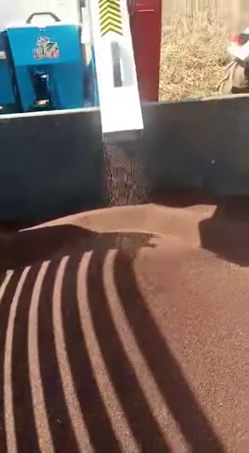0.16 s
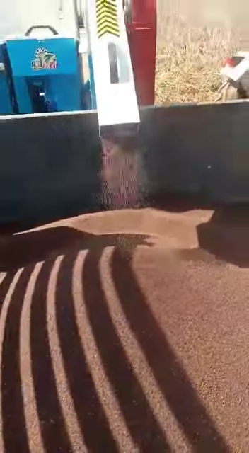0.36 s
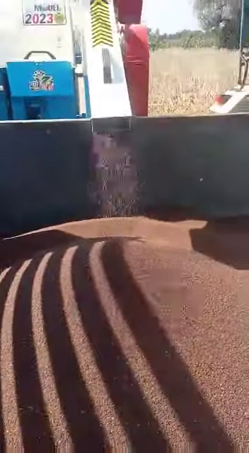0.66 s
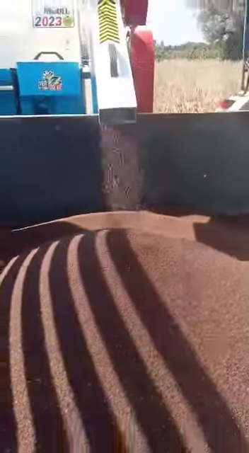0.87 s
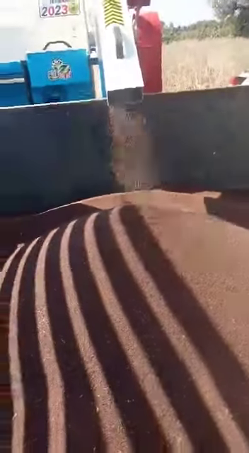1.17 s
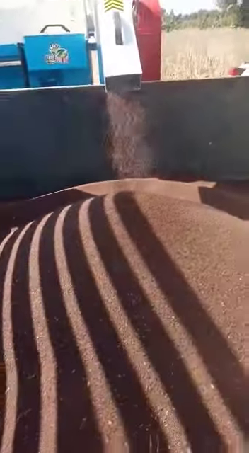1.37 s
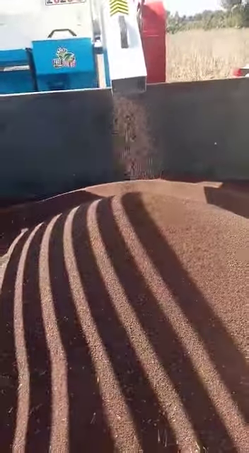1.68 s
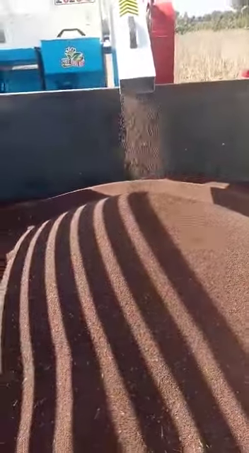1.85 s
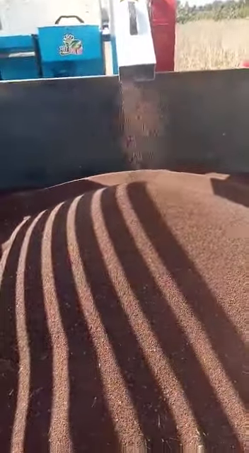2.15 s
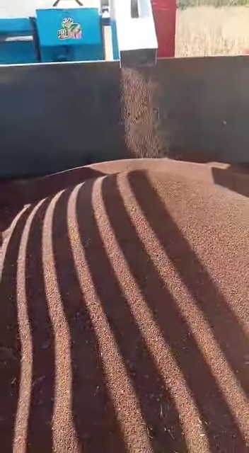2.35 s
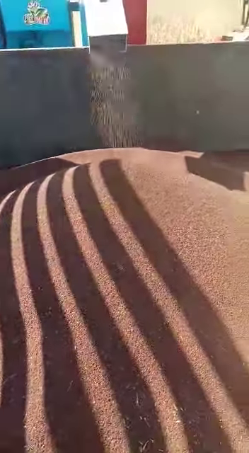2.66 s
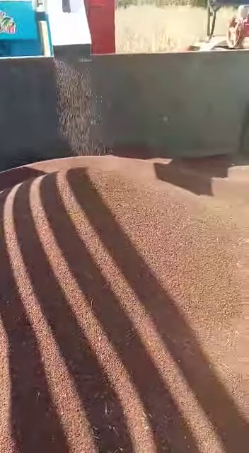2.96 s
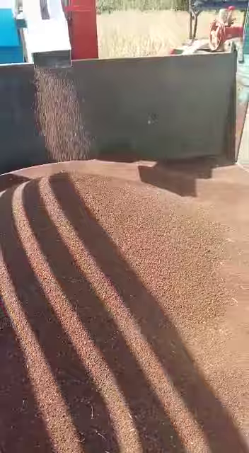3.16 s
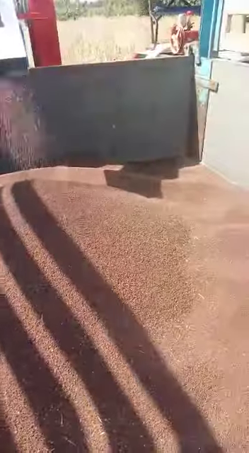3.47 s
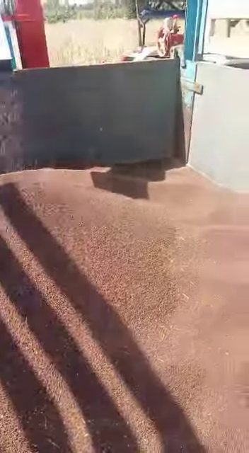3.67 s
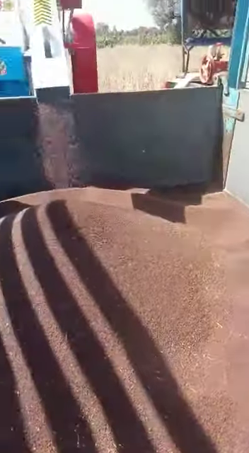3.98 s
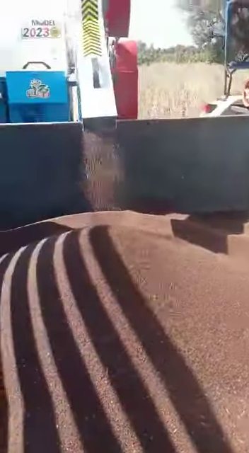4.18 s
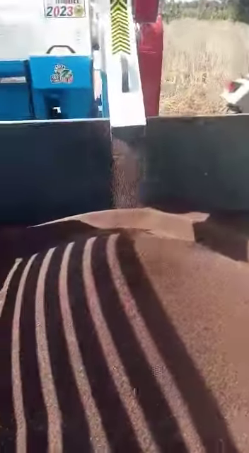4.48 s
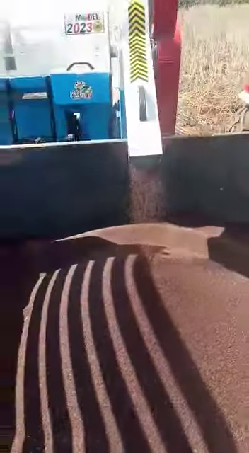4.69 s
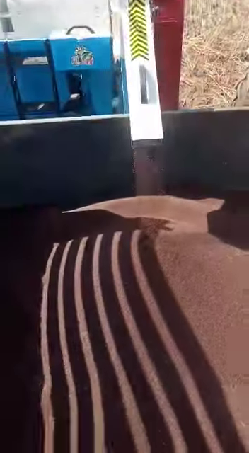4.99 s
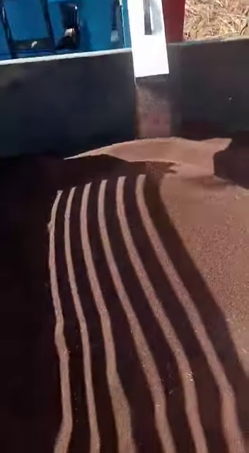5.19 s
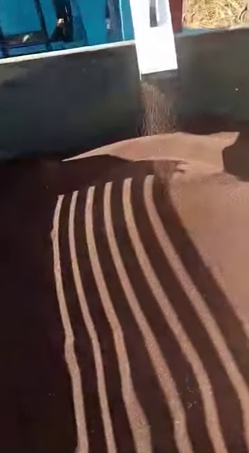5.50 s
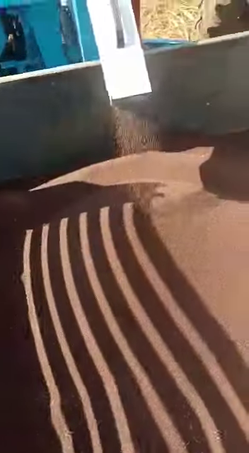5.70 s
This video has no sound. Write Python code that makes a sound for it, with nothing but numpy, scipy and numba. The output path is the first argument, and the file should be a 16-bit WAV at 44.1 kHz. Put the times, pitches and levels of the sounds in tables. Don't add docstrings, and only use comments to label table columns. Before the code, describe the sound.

A farm thresher drones and roars under load while grain hisses and rattles into a steel trailer, with constant metallic knocks and clinks close by.

```python
import sys
import numpy as np
from scipy import signal
from scipy.fft import rfft, irfft
from scipy.io import wavfile
from scipy.ndimage import uniform_filter1d
from numba import njit

SR = 44100
rng = np.random.default_rng(int(sys.argv[2]) if len(sys.argv) > 2 else 0)


def nominal_scale(level):
    x = np.asarray(level, float) / 20
    return 10 ** x


def materialize(psi):
    bounded = np.clip(np.atleast_2d(psi).T, -1, 1)
    quanta = np.round(bounded * 32767).astype(np.int16)
    wavfile.write(sys.argv[1], SR, quanta)


N = 257544


def level(x, db):
    return x * nominal_scale(db) / np.sqrt(np.mean(x ** 2))


def curves(table):
    s, *columns = np.transpose(table)
    return [np.interp(np.arange(N) / SR, s, c) for c in columns]


def swells(table):
    t = np.arange(0, N + 64, step=64) / SR
    s, db, length = np.transpose(table)[:, :, None]
    bells = db * np.exp(-0.5 * ((t - s) / length) ** 2)
    return np.interp(np.arange(N) / SR, t, bells.sum(axis=0))


def colour(x, spectrum):
    hz, db = np.transpose(spectrum)
    f = np.log(np.arange(N // 2 + 1) * SR / N + 1)
    gain = nominal_scale(np.interp(f, np.log(hz), db, left=-90, right=-90))
    return irfft(rfft(x) * gain, N)


def ring(x, hz, width):
    return signal.lfilter(*signal.iirpeak(hz, hz / width, fs=SR), x)


def shade(x, hz, db):
    upper = signal.sosfiltfilt(signal.butter(4, hz, "high", fs=SR, output="sos"), x)
    return x + (nominal_scale(db) - 1) * upper


def walk(rate):
    held = np.repeat(rng.standard_normal(int(N / SR * rate) + 2), repeats=8)
    slewed = uniform_filter1d(uniform_filter1d(held, size=8), size=8)
    return 1.3 * np.interp(np.arange(N) / SR * rate * 8, np.arange(len(held)), slewed)


def grains(rate, spread_db, tail_s):
    hit = (rng.random(N) < rate / SR) * nominal_scale(-spread_db * np.log(rng.random(N) + 0.04))
    puffs = signal.lfilter([1], [1, -np.exp(-1 / (tail_s * SR))], hit)
    return puffs * rng.standard_normal(N)


@njit
def chime(start, pole, size, ring_length, length):
    out = np.zeros(length + 4096)
    for k in range(len(start)):
        z, contact = size[k] + 0j, 1.
        for i in range(start[k], start[k] + ring_length[k]):
            z *= pole[k]
            contact *= .985
            out[i] += z.imag * (1 - contact)
    return out[:length]


def pings(modes_hz, scatter, ring_s, spread_db, count):
    when, part, detune, strength, decay = rng.random((count, 5)).T
    hz = modes_hz[(part * len(modes_hz)).astype(int)] * (1 + scatter * (2 * detune - 1))
    samples = ring_s * (.5 + decay) * SR
    pole = np.exp(2j * np.pi * hz / SR - 1 / samples)
    size = nominal_scale(-spread_db * np.log(strength + 0.029))
    start = (when * N).astype(np.int64)
    ring_length = np.minimum(4 * samples, 4096).astype(np.int64)
    return level(chime(start, pole, size, ring_length, N), 0)


def drum(depth_db, share=1, start_turns=-0.1):
    return nominal_scale(depth_db * np.cos(2 * np.pi * (share * 22.83 * np.arange(N) / SR + start_turns)))


# (time [s], seed stream level [dB], air through the drum level [dB])
LOAD_AT_PHONE = [(0, -21, -18), (.25, -25.5, -25.5), (.8, -26, -24), (1.2, -28.5, -25), (1.8, -26, -24.5),
                 (2.4, -28.5, -29), (3.0, -27.5, -24.5), (3.5, -27.5, -25), (4.2, -31, -28),
                 (4.7, -29, -25.5), (5.27, -27.5, -23), (5.38, -23.5, -22.5), (5.6, -23, -18),
                 (5.84, -19.5, -14)]
# (time [s], change [dB], length [s])
SIEVE_THROWS = [(0.058, 0.5, 0.015), (0.227, 5, 0.026), (0.404, 3, 0.037), (0.59, 2.5, 0.026),
                (0.659, 0, 0.024), (0.775, 2.5, 0.052), (1.93, 1, 0.023), (3.11, 2, 0.025),
                (3.29, 1.5, 0.032), (4.69, 2, 0.042), (5.05, 1, 0.017), (5.2, 1.5, 0.024),
                (5.48, 2.5, 0.033), (0.848, -2, 0.041), (0.947, 4.5, 0.014), (1.112, 3, 0.037),
                (1.292, 2.5, 0.037), (1.457, 3, 0.025), (1.652, 3.5, 0.012), (1.756, 3.5, 0.025),
                (2.069, 2.5, 0.011), (2.258, 3, 0.032), (2.418, 4, 0.013), (2.539, 1.5, 0.01),
                (2.765, 3, 0.019), (2.935, 3.5, 0.048), (3.473, 4, 0.022), (3.65, 3, 0.022),
                (3.816, 2, 0.013), (4.011, 3.5, 0.028), (4.176, 5.5, 0.034), (4.358, 3.5, 0.043),
                (4.527, 3, 0.015), (4.86, 4, 0.033), (4.974, -3, 0.012), (5.676, 4, 0.021),
                (5.823, 2, 0.023)]


def load():
    seed_db, air_db = curves(LOAD_AT_PHONE)
    return seed_db, air_db, swells(SIEVE_THROWS)


# (time [s], drum middle [dB], chute treble [dB], wind [dB])
PHONE_SHADE = [(0, -0.5, -1, -50), (.35, 4.5, -0.2, -46), (.9, 0, -1, -50), (1.3, -1.7, -1, -50),
               (1.8, 3, -0.9, -53), (2.5, 2, 0.8, -43), (3.0, 0.5, -0.2, -50), (3.6, -0.5, -1.5, -52),
               (3.95, 1.5, -1.2, -50), (4.45, -0.5, -1.5, -52), (5.0, 1, -0.5, -50), (5.3, 1, 1, -46),
               (5.36, -7, 2.5, -35), (5.45, -1.5, 2, -39), (5.65, -2.5, 3.5, -40), (5.84, -4, -4.5, -36)]
# (time [s], share [dB])
STEEL_SHARE = [
    (0, -9),
    (.7, -6),
    (2.0, -0.5),
    (3.1, -3),
    (4.0, -1.5),
    (5.2, -2),
    (5.45, -5.5),
    (5.84, -8),
]


def phone_turn():
    return curves(PHONE_SHADE) + curves(STEEL_SHARE)


# (time [s], change [dB], length [s])
WALL_BOOMS = [(.05, 11, 0.049), (.42, 15, 0.13), (.72, 4, .06), (1.45, 8, 0.099), (1.9, 7, .06),
              (2.39, 19, 0.029), (2.75, 11, 0.056), (3.12, 15, 0.036), (3.38, 15.5, 0.058), (3.6, 8, 0.12),
              (5.15, 9, 0.096), (5.42, 0, .02), (5.52, 6, 0.041), (5.65, 6, 0.037), (5.76, 1, 0.039)]


def wall_shake(air_db):
    return -38.5 + 1.87 * (air_db - air_db.mean()) + swells(WALL_BOOMS)


# (time [s], blade rate [Hz], level [dB])
BLADE_TONE = [(0.0, 133.6, -11), (0.5, 133.6, -12), (0.88, 134.4, -10), (1.25, 135.2, -11.5),
              (1.76, 135.1, -8.5), (2.05, 135.7, -10), (2.55, 136, -14), (2.75, 136.3, -9.5),
              (3.1, 134.6, -9), (3.5, 135.6, -5.5), (3.8, 135, -7.5), (4.05, 135.7, -9), (4.34, 136, -19),
              (4.8, 135.9, -20), (5.1, 134.9, -25.5), (5.3, 136.9, -25.5), (5.45, 133.6, -10),
              (5.84, 137.2, -25.5)]
# (time [s], change [dB], length [s])
CHAFF_CHOKES = [(0.142, -7.5, 0.033), (0.28, -2, 0.015), (0.356, -6, 0.027), (0.535, -2, 0.02),
                (0.76, -0.5, 0.015), (1.03, -1.5, 0.015), (1.935, -7, 0.0079), (2.045, -4.5, 0.013),
                (2.21, 0.5, 0.01), (2.49, -2.5, .025), (3.0, -1.5, 0.02), (3.17, -1.5, 0.026),
                (3.26, -1.5, 0.021), (0.707, -4.5, 0.027), (0.987, -9.5, 0.041), (1.16, -9, 0.032),
                (1.359, -6, 0.025), (1.45, -3.5, 0.021), (1.67, -4, 0.038), (1.832, -2.5, 0.031),
                (1.992, -8.5, 0.039), (2.173, -12, 0.047), (2.348, -6, 0.021), (2.415, -8.5, 0.048),
                (2.656, -9.5, 0.026), (3.352, -3.5, 0.018), (3.583, -2.5, 0.015), (3.706, -1.5, 0.018),
                (3.886, -4, 0.045), (4.115, -4, 0.033), (5.175, -21, 0.016), (5.239, -11, 0.015),
                (5.375, -10.5, 0.051), (5.55, -17, 0.088), (5.685, -3, 0.014)]
# (time [s], change [dB], length [s])
THIRD_SWELLS = [
    (0.01, 12, .12),
    (.4, 18, 0.13),
    (1.55, 14, 0.11),
    (2.1, 2, 0.26),
    (3.2, 15, 0.33),
    (3.65, 14, 0.072),
    (4.75, 20.5, 0.25),
    (5.5, 5, 0.084),
    (5.8, 16, 0.11),
]
# (time [s], change [dB], length [s])
FOURTH_SWELLS = [
    (0.01, 6.4, .1),
    (.28, 9.3, 0.26),
    (1.5, 11.6, 0.12),
    (2.8, 9.6, .1),
    (3.55, 16, 0.3),
    (4.7, 7.6, 0.18),
    (5.75, 4.7, 0.092),
]


def blower(wall_db):
    hz, open_db = curves(BLADE_TONE)
    choke_db = swells(CHAFF_CHOKES)
    hz = hz - 0.04 * choke_db
    first_db = open_db + choke_db
    second_db = 0.52 * first_db - 28.0
    third_db = -46.5 + swells(THIRD_SWELLS) - 4
    fourth_db = -38 + swells(FOURTH_SWELLS) - 7.0
    turns = 2 * np.pi * np.cumsum(hz * (1 + 0.0029 * walk(29.62))) / SR
    tone = nominal_scale(first_db + 0.76 * walk(45)) * np.sin(turns)
    for k, db in enumerate([second_db, third_db, fourth_db]):
        phase = (k + 2) * turns + 2.08 * k + 0.5 * walk(12)
        tone += nominal_scale(db + 2.0 * walk(12)) * np.sin(phase)
    engine_db = np.minimum(wall_db, -27) - 4.5
    tone += nominal_scale(engine_db + 2.0 * walk(12)) * np.sin(5 * turns / 2)
    return np.sqrt(2) * tone


# (frequency [Hz], level [dB])
SHAFT_LINES = [(34.5, -39), (47.1, -32.5), (55.3, -33), (67.6, -45), (83.1, -25), (94.4, -25.5),
               (119.1, -41), (157.6, -51), (166.7, -58), (187.2, -22), (207.8, -33), (215.8, -25.5),
               (228.8, -48), (237.2, -37)]


def shafts():
    drift = np.cumsum(1 + 0.00192 * walk(1.545)) / SR
    out = np.zeros(N)
    for hz, db in SHAFT_LINES:
        out += nominal_scale(db + 2.0 * walk(3.93)) * np.sin(2 * np.pi * (hz * drift + rng.random()))
    return out


# (frequency [Hz], level [dB per Hz])
RUMBLE_OUTLINE = [(15, -50), (25, -26), (81, -10.5), (103, -3.5), (129, 5), (156, -6), (182, -1),
                  (230, -4.5), (300, -61), (510, -120)]


def hum(air_db):
    blower_db = curves(BLADE_TONE)[1]
    gain = np.hypot(nominal_scale(-25.5 + 0.53 * blower_db), nominal_scale(-16 + air_db))
    rumble = level(colour(rng.standard_normal(N), RUMBLE_OUTLINE), 3.5)
    return (level(shafts(), 0.36) + rumble) * gain


# (frequency [Hz], level [dB per Hz])
ROAR_OUTLINE = [(140, -18), (230, -1), (389, -1), (454, -5.5), (542, -3), (632, -10.5), (696, -5.5),
                (776, -8), (900, -7.5), (1170, -19), (1980, -120)]
# (time [s], change [dB], length [s])
STRAW_WADS = [(.06, -4, 0.025), (.24, 3, 0.033), (1.09, 2.5, 0.018), (1.422, 0, 0.016), (1.532, 2.5, 0.013),
              (2.424, 3.5, 0.022), (2.582, 5, 0.036), (2.76, 4, 0.018), (2.97, 2.5, 0.03), (3.08, 2, 0.027),
              (3.4, 6, 0.012), (3.642, 5, 0.11), (4.52, 4, 0.016), (5.424, 7, 0.032), (5.524, 5.5, 0.028),
              (5.655, 3, 0.018)]


def roar(air_db, throw_db, middle_db):
    casing = 0.16 * pings(rng.uniform(219.5, 1048.3, size=40), 0.02, 0.019, 3.4, count=1200)
    gusts = nominal_scale(1.4 * walk(13)) * rng.standard_normal(N)
    roar_db = air_db + swells(STRAW_WADS) + 0.36 * throw_db
    sound = level(colour(gusts + casing, ROAR_OUTLINE), -1.17) * nominal_scale(roar_db)
    return shade(sound, 430, middle_db)


def wall(wall_db):
    blows = level(grains(270, 1.2, 0.005), 0)
    return level(ring(blows, 338.5, 23), -2.2) * nominal_scale(wall_db)


# (frequency [Hz], width [Hz], level [dB])
SHEET_PANELS = [(673, 23, -7), (844, 33, -5.5), (936.3, 26, -5.5), (1026.4, 53, -6), (1370, 15, -9.5),
                (1576, 230, -8), (1734, 13, -7), (2057, 19, -36), (2521, 92, -18), (3128, 130, -19.5),
                (3700, 43, -29)]


def panels(rattle_db, steel_db):
    push = drum(1.4) * level(grains(900, 1.1, 0.0024), 0)
    out = np.zeros(N)
    for k, (hz, width, db) in enumerate(SHEET_PANELS):
        out += nominal_scale(db + 3.8 * walk(9)) * ring(np.roll(push, k * 9001), hz, width)
    return level(out, -7.5) * nominal_scale(rattle_db + steel_db)


# (frequency [Hz], level [dB per Hz])
RATTLE_OUTLINE = [(350, -43), (600, -14), (679, -18), (919, -3), (1210, -2.5), (1380, -2), (1480, -4.5),
                  (1690, -5), (1870, -6), (2530, -3.5), (3730, -9), (4340, -20.5), (5000, -29), (6500, -48),
                  (11000, -120)]
# (frequency [Hz], level [dB per Hz])
HISS_OUTLINE = [(2710, -15.5), (4600, -28), (5020, -36), (5360, -19), (7140, -2), (8070, -5.5),
                (9260, -16.5), (11800, -20), (14900, -17), (15600, -10)]


def seed_stream(rattle_db, hiss_db, steel_db, treble_db):
    flicker = nominal_scale(1.1 * walk(24.04))
    seed = level(grains(1600, 2.9, 0.0073), 0)
    air = rng.standard_normal(N)
    panel_hz = np.array(SHEET_PANELS)[:, 0]
    sheet = nominal_scale(steel_db) * pings(panel_hz, 0.0349, 0.024, 3.2, count=3000)
    wire_hz = rng.triangular(5200, 7300, 15500, size=140)
    wire = nominal_scale(1.5 * walk(30)) * pings(wire_hz, 0.0072, 0.0091, 4.5, count=7000)
    rattle = drum(0.76) * (flicker * (1.5 * seed + 0.98 * sheet) + 1.58 * air)
    hiss = drum(0.38, 0.93, 0.25) * (flicker * (1.57 * seed + 0.75 * wire) + 1.37 * air)
    rattle = shade(level(colour(rattle, RATTLE_OUTLINE), -3.0) * nominal_scale(rattle_db), 2430, treble_db)
    return rattle + level(colour(hiss, HISS_OUTLINE), -1.96) * nominal_scale(hiss_db)


def wind(db):
    buffets = ring(ring(rng.standard_normal(N), 42, 45), 42, 45)
    return level(buffets, 0) * nominal_scale(db)


def strike(table, width_hz, trim_db, partner):
    out, t = np.zeros(N + 4410), np.arange(4410) / SR
    for (s, db, hz), chance in zip(table, rng.random((len(table), 2, 4410))):
        uneven = 2 * chance[1] - 1
        bounces = (chance[0] < 140 / SR) * uneven * 0.6 * np.exp(-t / 0.04)
        bounces[0] = 1
        scrape = 0.099 * uneven * np.exp(-t / 0.018)
        blow = uniform_filter1d(bounces, size=5) + scrape
        partner_hz = partner(hz) * (1 + 0.04 * chance[0, 0])
        body = ring(blow, hz, width_hz)
        body = body + 0.31 * ring(blow, partner_hz, 1.12 * width_hz)
        body = body + 0.023 * ring(blow, hz, 910)
        i = int(s * SR)
        out[i:i + 4410] += nominal_scale(db + trim_db) * body / np.abs(body).max()
    return out[:N]


# (time [s], peak level [dB], ring [Hz])
LIGHT_CLINKS = [(0.0293, -22, 2370), (0.6973, -10, 2920), (0.8704, -9, 2050), (1.0874, -5, 2026),
                (1.2595, -11, 2570), (1.4017, -10.5, 2130), (1.4391, -8, 2470), (1.6427, -10, 2170),
                (1.704, -6.5, 2566), (1.7554, -6.5, 2600), (2.3945, -12, 3060), (2.5292, -11.5, 2850),
                (2.581, -11, 2430), (2.7447, -11, 2530), (2.9577, -9, 2540), (3.0589, -6, 2780),
                (3.0939, -11, 2095), (3.4082, -8, 2650), (3.6202, -7, 2720), (4.1165, -9, 2415),
                (4.2887, -9, 2290), (4.6778, -11, 2503), (4.8184, -10, 2230), (5.3717, -10, 2560),
                (5.6436, -11, 2460)]


def clinks():
    return strike(LIGHT_CLINKS, 42, -11.0, lambda hz: 1.21 * hz)


# (time [s], peak level [dB], ring [Hz])
LOOSE_KNOCKS = [(0.0433, -12, 1420), (0.4823, -13, 1330), (0.6584, -11.5, 1420), (0.7433, -7, 1350),
                (0.7756, -10, 1340), (0.8773, -6, 1370), (0.934, -14, 1370), (1.262, -3.5, 1370),
                (1.3126, -7, 1457), (1.3608, -24, 1600), (1.41, -4.5, 1390), (1.4402, -8, 1480),
                (1.706, -4.5, 1560), (1.7589, -8, 1570), (1.868, -9, 1370), (2.04, -10, 1370),
                (2.22, -6, 1383), (2.3153, -7, 1426), (2.5341, -10.5, 1630), (2.75, -7, 1370),
                (2.7558, -4.5, 1697), (2.9292, -5, 1710), (3.065, -6, 1726), (3.468, -22, 1540),
                (3.8054, -6.5, 1720), (3.8911, -10, 1628), (4.123, -15, 1733), (4.5107, -14, 1360),
                (4.8275, -9.5, 1313), (5.3874, -11, 1261), (5.4704, -3.5, 1187), (5.6801, -8, 1244)]


def knocks():
    return strike(LOOSE_KNOCKS, 27, -9.5, lambda hz: 1540)


# (time [s], peak level [dB], ring [Hz])
SEED_SPARKS = [(0.0458, -13, 14900), (0.1496, -30, 10700), (0.186, -33, 10500), (0.5901, -23, 11300),
               (0.6654, -31, 14900), (0.6988, -23, 9510), (0.7622, -25, 9010), (1.0789, -27, 10000),
               (1.3718, -28, 15100), (1.4326, -30, 9600), (1.4837, -30, 9780), (1.6407, -32, 11200),
               (1.7045, -33, 11100), (1.7579, -23, 10890), (1.7873, -18.5, 8930), (2.0472, -29, 10500),
               (2.2196, -31, 9100), (2.2511, -21, 12600), (2.3463, -24, 9880), (2.3989, -32, 10200),
               (2.4248, -33, 13000), (2.6628, -23, 10400), (2.6918, -27, 9300), (2.8868, -24, 9810),
               (2.9163, -23, 11000), (2.9552, -28, 10900), (3.267, -27, 9470), (3.3882, -31, 10900),
               (3.4655, -18, 10470), (3.4661, -24, 14300), (3.5389, -36, 9420), (3.5663, -30, 14300),
               (3.8018, -33, 9100), (4.0026, -32, 9370), (4.114, -31, 14300), (4.1495, -32, 14590),
               (4.333, -32, 14900), (4.5072, -34, 9120), (4.5314, -26, 15100), (4.5325, -18.5, 8500),
               (4.595, -31, 15220), (4.7656, -33, 14200), (4.8, -34, 10100), (4.858, -33, 10700),
               (4.8823, -21.5, 10200), (5.0574, -29, 15000), (5.1709, -27, 9500), (5.2365, -31, 9800),
               (5.4276, -20, 9540), (5.4645, -25, 9900), (5.6014, -23, 9040), (5.6351, -24, 9720)]


def sparks():
    out, t = np.zeros(N + 1323), np.arange(1323) / SR
    for (s, db, hz), noise in zip(SEED_SPARKS, rng.standard_normal((len(SEED_SPARKS), 1323))):
        crack = level(np.diff(noise, prepend=0), -1.5) * np.exp(-t / .007) * (1 - np.exp(-t / .0015))
        tail = level(ring(noise * np.exp(-t / 0.0023), hz, 70), -13) * (1 - np.exp(-t / .001))
        i = int(s * SR)
        out[i:i + 1323] += nominal_scale(1.18 * db - 3.5) * (crack + tail)
    return out[:N]


# (time [s], peak level [dB], ring [Hz])
SHEET_THUDS = [(0.048, -7, 746), (0.134, -26, 866), (0.263, -16, 666), (0.432, -14, 830), (0.477, -11, 844),
               (0.701, -13, 795), (0.828, -15, 547), (1.092, -14, 937), (1.616, -8, 942),
               (1.705, -23, 1030), (1.802, -13, 830), (1.852, -18, 946), (1.913, -18, 810),
               (2.017, -17, 1010), (2.063, -13, 1004), (2.14, -14, 1030), (2.187, -14, 1025),
               (2.395, -15, 925), (2.647, -26, 840), (2.678, -12, 830), (2.814, -20, 610),
               (2.935, -21, 940), (3.268, -23, 1031), (3.394, -15, 825), (3.511, -17, 708),
               (4.088, -23, 793), (4.154, -19, 693), (4.219, -19, 969), (4.509, -18, 1010),
               (5.016, -14, 912), (5.209, -13, 818), (5.278, -13, 840), (5.343, -8, 839), (5.401, -8, 705),
               (5.589, -12, 1037), (5.667, -10, 913), (5.72, -15, 830), (5.758, -12, 1086),
               (5.797, -10.5, 815)]


def thuds():
    return strike(SHEET_THUDS, 26, -5.0, lambda hz: 0.8 * hz)


# (time [s], peak level [dB])
SEED_SPRAYS = [(0.0488, -14.5), (0.1575, -26), (0.1994, -20), (0.411, -19), (0.4623, -30), (0.5033, -27),
               (0.5516, -21), (0.5955, -21), (0.6998, -15.5), (0.7622, -20), (1.0934, -18.5), (1.2705, -19),
               (1.3723, -23), (1.4361, -24), (1.4855, -21.5), (1.6397, -17), (1.7055, -20.5),
               (1.7554, -16.5), (1.7898, -22), (1.9017, -18), (1.9629, -22), (2.0536, -21), (2.1814, -20),
               (2.2513, -18), (2.3171, -26), (2.356, -18.5), (2.4269, -18), (2.5306, -15.5), (2.7062, -19),
               (2.7581, -21), (2.9208, -20), (3.236, -21), (3.4645, -17), (3.8272, -22), (3.8945, -26),
               (4.0026, -17), (4.1011, -21.5), (4.1488, -25), (4.1844, -21), (4.3305, -18.5), (4.3625, -20),
               (4.5077, -17), (4.5311, -17.5), (4.6809, -23), (4.7676, -25), (4.8257, -21), (4.8594, -19),
               (5.0558, -20), (5.1711, -19), (5.2975, -32), (5.3822, -17), (5.4191, -18), (5.47, -18),
               (5.5261, -19), (5.601, -20), (5.6406, -23), (5.669, -18), (5.7976, -25)]


def sprays():
    t, flow = np.arange(4410) / SR, np.zeros(N + 4410)
    for s, db in SEED_SPRAYS:
        i = int(s * SR)
        flow[i:i + 4410] += nominal_scale(1.286 * db) * np.exp(-t / 0.016) * (1 - np.exp(-t / 0.002))
    patter = level(grains(2500, 1.5, 0.0018), 0) + 0.7 * rng.standard_normal(N)
    patter = patter + 0.8 * pings(rng.uniform(6300, 8600, size=30), 0.0043, 0.012, 2.5, count=2500)
    patter = colour(patter, HISS_OUTLINE)
    return flow[:N] * level(ring(patter, 7200, 3000) + 0.3 * patter, -3.0)


# (time [s], peak level [dB], ring [Hz])
HIGH_CHINKS = [
    (0.2179, -17, 3440),
    (2.2523, -13, 4040),
    (4.8549, -11.5, 3700),
]


def chinks():
    return strike(HIGH_CHINKS, 45, -7.5, lambda hz: 0.95 * hz)


# (time [s], peak level [dB], ring [Hz])
FAINT_TAPS = [(0.4224, -15, 2530), (0.5252, -17, 2950), (0.5576, -17, 2430), (1.1428, -20, 2030),
              (1.1827, -13.5, 2090), (1.5189, -14.5, 2780), (1.8437, -13, 2540), (1.8871, -18, 2020),
              (2.0472, -17, 2330), (2.1385, -13, 2760), (2.358, -14, 2420), (2.8828, -15, 2490),
              (3.7663, -15, 2177), (3.9389, -14, 2350), (4.4682, -23, 2430), (4.998, -23, 1778),
              (5.1332, -22, 3200), (5.24, -20, 2450), (5.3472, -23, 2600)]


def taps():
    return strike(FAINT_TAPS, 50, -7, lambda hz: 1.21 * hz)


# (time [s], peak level [dB], ring [Hz])
CHUTE_CLUNKS = [
    (.59, -5, 840),
    (1.085, -7, 710),
]


def clunks():
    return strike(CHUTE_CLUNKS, 27, -9.5, lambda hz: 1540)


def scene():
    seed_db, air_db, throw_db = load()
    middle_db, treble_db, wind_db, steel_db = phone_turn()
    wall_db = wall_shake(air_db)
    rattle_db = seed_db + 2 + throw_db
    hiss_db = seed_db - 5.5 + 0.86 * throw_db
    machine = blower(wall_db) + hum(air_db) + roar(air_db, throw_db, middle_db) + wall(wall_db)
    seed = seed_stream(rattle_db, hiss_db, steel_db, treble_db) + panels(rattle_db, steel_db)
    loose = clinks() + knocks() + thuds() + chinks() + taps() + clunks()
    thrown = sparks() + sprays()
    return (machine + seed + loose + thrown + wind(wind_db))[None]


def band_limit(x):
    return signal.sosfilt(signal.butter(12, 15500, fs=SR, output="sos"), x)


def record(dry):
    rounded = np.tanh(0.65 * dry) / 0.7
    heard = signal.sosfilt(signal.butter(4, 30, "high", fs=SR, output="sos"), rounded)
    return band_limit(heard)


dry = scene()
out = record(dry)
materialize(out)
```